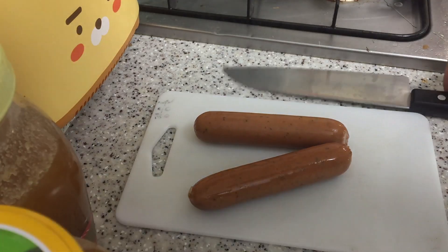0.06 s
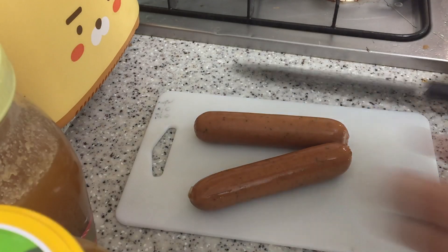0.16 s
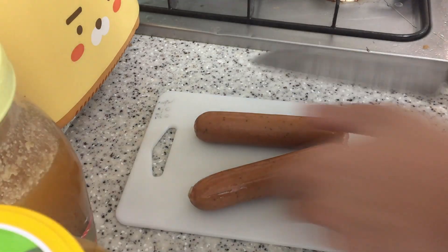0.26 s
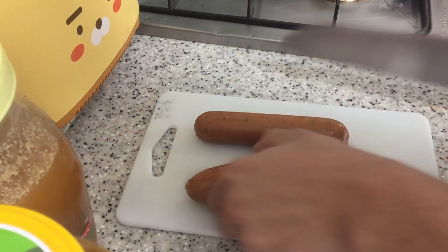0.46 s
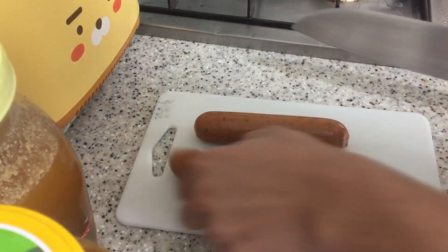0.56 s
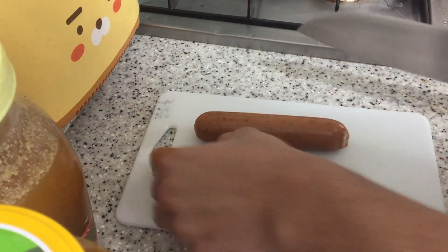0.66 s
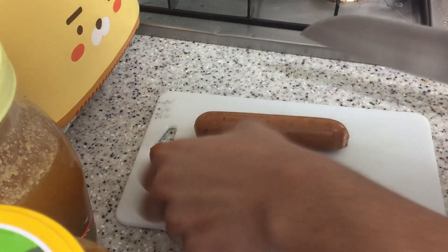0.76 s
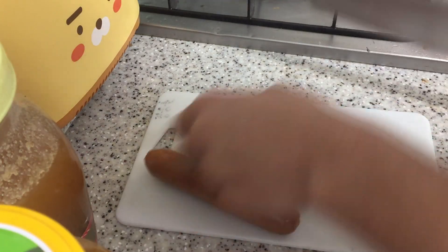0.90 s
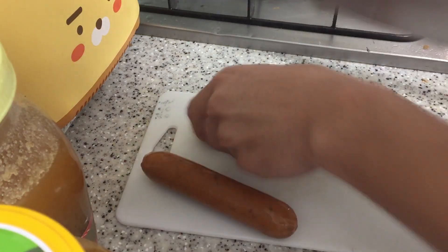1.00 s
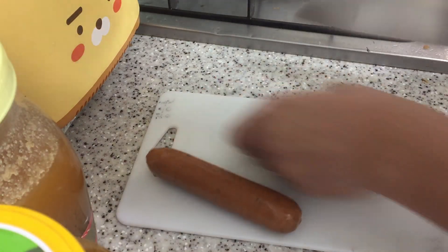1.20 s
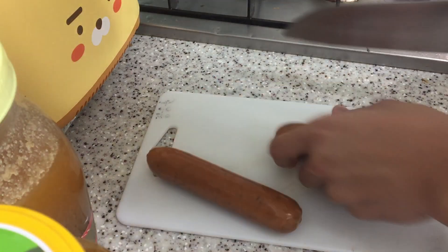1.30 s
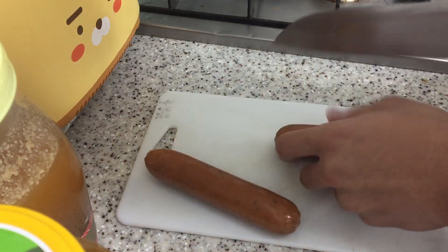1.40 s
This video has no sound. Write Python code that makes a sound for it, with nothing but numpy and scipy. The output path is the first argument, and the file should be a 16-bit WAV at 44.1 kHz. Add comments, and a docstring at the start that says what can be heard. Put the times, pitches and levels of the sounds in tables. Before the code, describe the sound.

A metal knife is lifted from a stone counter with a short, bright scrape, a knock and a brief ring. Then a hand softly rubs and taps a sausage on a plastic board. A refrigerator hums faintly in the small kitchen.

```python
"""A kitchen knife is picked up from a stone counter: the blade drags, scrapes brightly, knocks and rings.
Tiny slips of the edge on the stone hiss, squeal and drive the blade's resonances; the knocks
thump through the counter. Then a hand shifts a sausage on a plastic board, with soft, moist taps
and some rubbing. A refrigerator hums in the small kitchen."""
import sys
import numpy as np
from scipy import signal
from scipy.fft import rfft, irfft
from scipy.io import wavfile

SR = 44100
rng = np.random.default_rng(int(sys.argv[2]) if len(sys.argv) > 2 else 0)


def to_wav(sig):
    """Store sig (one row per channel, or 1-D mono) as 16-bit WAV at the path in sys.argv[1].

    Samples outside -1..1 are clipped; the rate is SR.
    """
    pcm = np.clip(np.atleast_2d(sig), -1, 1) * 32767
    pcm = np.round(pcm).astype(np.int16)
    wavfile.write(sys.argv[1], SR, pcm.T)  # frames by channels


N = 63945
TIME = np.arange(N) / SR


def blade_scrape():
    """Slips of the edge over stone hiss and drive the blade's resonances."""
    # force of the drag: t/s, level/dB
    drag = [(0.092, -73), (0.14, -76), (0.156, -64), (0.17, -59.5), (0.182, -58), (0.2, -62.5),
            (0.249, -65), (0.256, -53), (0.272, -54.5), (0.285, -65), (0.296, -59.5), (0.326, -59.5),
            (0.349, -44.5), (0.367, -39), (0.386, -38.5), (0.403, -45), (0.422, -39.5), (0.434, -52),
            (0.47, -83)]
    # resonances of the blade while it touches the counter: f/Hz, width/Hz, level/dB
    pressed_modes = [(4390, 59, -1.5), (4790, 44, -4), (5100, 50, -15), (5530, 80, -2.5), (6680, 73, -13),
                     (6310, 13, -3.5), (7340, 79, -13.5), (8520, 35, -6), (9200, 36, 0.5), (9500, 47, -2.5),
                     (10000, 60, -9), (11100, 33, -1.5), (11800, 65, -2), (11800, 35, -21),
                     (12240, 30, -12), (12700, 50, -21), (14000, 46, -17), (14900, 78, -25),
                     (16200, 42, 2.5)]
    # hiss of the contact: f/Hz, level/dB
    grit_colour = [(90, -21), (500, -5), (900, -30), (1300, -12.5), (2000, -5.5), (2700, -2), (3200, -13.5),
                   (3800, -12), (5400, -6.5), (7500, -7), (10000, -6), (13300, -14), (15500, -5)]

    def blade(x):
        return sum(from_db(db) * resonate(x, hz, width) for hz, width, db in pressed_modes)

    slips = friction()
    force = from_db(np.interp(TIME, *np.transpose(drag), left=-120, right=-120))
    force *= from_db(2 * drift(hz=150))  # the edge grips unevenly
    ringing = from_db(-4.5) * blade(slips * force) / np.std(blade(slips))
    grit = from_db(-2.5) * force * coloured(slips, grit_colour)
    # sparse, sharp grains of stone under the edge
    sizzle = from_db(-11) * force * rms_one(cut(friction(per_s=900), 11500, "high"))
    scrape = ringing + grit + sizzle
    # slightly thinner until the edge bites at 0.265 s
    bite = np.clip(1 + (TIME - 0.265) / 0.018, from_db(-1.5), 1)
    return bite * scrape + (1 - bite) * cut(scrape, 7300, "high")


def blade_squeals(sag_hz_per_s=810):
    """As the contact slides along the edge, one mode after another swells, sags in pitch and fades."""
    # short, rough tones: peak t/s, half length/s, f/Hz, level/dB
    squeals = [(0.157, .006, 5440, -57), (0.204, 0.02, 5430, -63), (0.172, 0.011, 3700, -58.5),
               (0.272, 0.018, 2340, -57.5), (0.299, 0.0066, 2414, -49.5), (0.321, 0.023, 2343, -56),
               (0.3, 0.026, 4225, -60.5), (0.3494, 0.018, 3870, -49.5), (0.35, 0.011, 6300, -48.5),
               (0.352, 0.011, 4360, -56), (0.364, 0.011, 2362, -40), (0.375, 0.012, 1798, -45),
               (0.372, 0.0063, 3650, -44), (0.37, 0.006, 8330, -41.5), (0.385, 0.015, 8515, -46),
               (0.382, 0.0039, 3530, -42.5), (0.382, 0.0085, 9700, -39), (0.41, 0.024, 9590, -49),
               (0.383, 0.0082, 3100, -51), (0.383, 0.0096, 4340, -41.5), (0.394, 0.016, 1270, -48),
               (0.382, 0.019, 5615, -53), (0.386, 0.0094, 5290, -43.5), (0.392, 0.021, 2248, -51),
               (0.393, 0.0084, 6610, -43.5), (0.395, 0.027, 12270, -47), (0.412, 0.016, 4177, -39),
               (0.4, .008, 15300, -56), (0.42, .01, 14000, -48), (0.417, 0.016, 10960, -46.5)]
    out = 0
    for s, half_s, hz, db in squeals:
        age = TIME - s
        turns = hz * age - sag_hz_per_s * age ** 2 / 2
        swell = from_db(db) * np.exp(-(age / half_s) ** 2)
        out += swell * wavering(turns, depth=0.23, rate_hz=90)
    return out


def edge_ticks():
    """The edge catches on the stone in short, bright ticks, each with its own low edge."""
    # catches: t/s, level/dB, t60/s, low edge/Hz
    catches = [(0.0968, -61.5, 0.018, 1500), (0.14, -57.5, 0.055, 800), (0.256, -62, 0.024, 7000),
               (0.274, -45.5, 0.035, 4260), (0.4106, -44, 0.028, 3500)]
    # spectrum of a catch: f/Hz, level/dB
    tick_colour = [(700, -18), (1500, 2), (3300, 4), (4500, 7), (9000, -3), (15800, -25)]
    slips = coloured(friction(), tick_colour)
    return sum(from_db(db) * decay(s, t60) * cut(slips, low_hz, "high")
               for s, db, t60, low_hz in catches)


def blade_clink():
    """A blow sets the free blade's modes ringing."""
    # blow on the blade: t/s, level/dB
    blows = [(0.4236, -37.5)]
    # modes of the free blade: f/Hz, level/dB, t60/s
    free_modes = [(1195, 6, .07), (1385, -7, .05), (1525, -3, .05), (1700, -17, .17), (2017, 1, .15),
                  (2254, -5, .11), (2405, -5, .06), (2680, -7, .18), (2751, -4, .16), (3440, -10, .04),
                  (4139, -2.5, .33), (4204, -4, .25), (4637, -4, .11), (4770, -6, .12), (5406, -5, .08),
                  (7429, -16, .18), (9190, -15, .11), (9570, -13, .1), (10960, -19, .1), (12580, -20, .29),
                  (13790, -15, .24)]
    return sum(from_db(db) * strike(s, free_modes) for s, db in blows)


def handle_knocks():
    """Each knock is a dull, quickly damped clack on top of the counter's low thump."""
    # knocks: t/s, level/dB, body f/Hz, body width/Hz, top edge/Hz, thump/dB, scatter/dB
    knocks = [(0.1425, -43, 620, 245, 1160, 2.5, -0.5), (0.151, -49.5, 445, 300, 910, 7.5, 6.5),
              (0.1808, -31, 1430, 200, 2200, -4.5, -15), (0.1799, -37.5, 3200, 704, 3500, -3, -8),
              (0.4181, -21, 575, 1560, 2460, -13, -10.5), (0.4233, -22, 2080, 268, 3030, -15, -4),
              (0.4236, -24.5, 1300, 189, 2100, -11, -23), (0.4289, -31.5, 2320, 450, 2980, -20, -3)]
    out = 0
    for s, db, hz, width_hz, edge_hz, thump_db, scatter_db in knocks:
        body = resonate(signal.unit_impulse(N, int(s * SR)), hz, width_hz)
        clack = cut(body, edge_hz, "low", order=4)
        clack /= np.abs(clack).max()
        # sound scatters from the things on the counter
        scatter = from_db(scatter_db) * reflect(clack, t60=0.096, delay_s=0.0032)
        thump = from_db(thump_db) * counter_ring(s)
        out += from_db(db) * (clack + scatter + thump)
    return cut(out, 163, "high", order=4)


def handle_rumble(peak_s=0.309, half_s=0.04):
    """Friction of the dragged handle shakes the counter's modes."""
    swell = from_db(-55) * np.exp(-((TIME - peak_s) / half_s) ** 2)
    shaking = signal.fftconvolve(friction(), counter_ring(0))[:N]
    return swell * rms_one(shaking)


def counter_ring(s):
    """The counter rings low after a blow at time s; peak 1."""
    # low modes of the counter top and board: f/Hz, level/dB, t60/s
    counter_modes = [(173, -6, 0.04), (283, 1.5, 0.095), (341, 2.5, 0.067), (478, 5.5, 0.069),
                     (571.5, -2, 0.082), (661, 2.5, 0.091), (874, -12.5, 0.12)]
    ringing = strike(s, counter_modes)
    return ringing / np.abs(ringing).max()


def board_taps():
    """Soft contacts ring the hollow plastic board, and the moist skin crackles at each one."""
    # taps on the board: t/s, level/dB, top edge/Hz
    taps = [(1.1614, -56.5, 9100), (1.1635, -50, 2540), (1.187, -60, 5000), (1.197, -59.5, 2000)]
    # modes of the plastic board: f/Hz, level/dB, t60/s
    board_modes = [(1262, -2.5, 0.05), (1500, 0, 0.039), (2020, -2, 0.072), (2283, -1.5, 0.06),
                   (2550, -2, .04), (3190, -4.5, 0.037), (3500, -5, 0.081), (5800, -8, 0.037),
                   (6640, -5.5, 0.037)]
    # crackle of moist skin: f/Hz, level/dB
    squish_colour = [(250, -2), (800, -4.5), (2200, -2), (4200, -12), (9000, -18), (14000, -45)]
    out = 0
    for s, db, edge_hz in taps:
        squish = from_db(2) * decay(s, t60=0.064) * coloured(friction(), squish_colour)
        out += from_db(db) * cut(strike(s, board_modes) + squish, edge_hz, "low")
    return out


def soft_thuds():
    """Hand and sausage land softly, each thud one low, dying tone."""
    # landings: t/s, level/dB, f/Hz, t60/s
    thuds = [(0.269, -60, 59.5, 0.24), (0.73, -58, 64.8, 0.25), (1.163, -40, 306, 0.045),
             (1.167, -48, 195, 0.097), (1.185, -47.5, 116, 0.11), (1.2, -59, 50.4, .14)]
    return sum(from_db(db) * ring(s, hz, t60) for s, db, hz, t60 in thuds)


def skin_rubs():
    """Skin rubs over the board in swells that each bring out one resonance."""
    # strokes: peak t/s, level/dB, attack/s, release/s, top edge/Hz, resonance f/Hz
    rubs = [(0.673, -54.5, 0.024, 0.031, 2520, 600), (0.73, -69.5, 0.063, 0.048, 8000, 3500),
            (1.01, -68.5, 0.031, 0.027, 12000, 4470), (1.305, -58.5, 0.053, 0.08, 9300, 5620),
            (1.35, -58, 0.058, 0.064, 12000, 3500)]
    # friction of skin on plastic: f/Hz, level/dB
    rub_colour = [(500, -23), (1250, -13.5), (1580, -2), (1900, -11.5), (2700, -9.5), (3150, -4.5),
                  (3500, -3), (4000, -5.5), (5700, -9.5), (7000, -10), (9000, -12), (15000, -22)]
    out = 0
    for s, db, attack, release, edge_hz, ring_hz in rubs:
        skin = coloured(friction(), rub_colour)
        skin += from_db(4.5) * resonate(skin, ring_hz, width_hz=220)
        from_peak = np.maximum((s - TIME) / attack, (TIME - s) / release)
        swell = from_db(db - 14.2 * from_peak ** 1.4)
        out += swell * cut(rms_one(skin), edge_hz, "low", order=1)
    return out


def refrigerator(motor_hz=58.7):
    """The motor's harmonics waver under a faint, narrow whine."""
    # hum: multiple of the motor's speed, level/dB
    harmonics = [(1, -77.5), (2, -72.5), (3, -60.5), (5, -73), (6, -65), (7, -67), (9, -73), (10, -67),
                 (11, -72)]
    hum = sum(from_db(db) * np.sqrt(2) * wavering(k * motor_hz * TIME, depth=0.21, rate_hz=5)
              for k, db in harmonics)
    whine = resonate(rng.standard_normal(N), hz=3476, width_hz=56)
    return hum + from_db(-80) * rms_one(whine)


def room_tone():
    """A steady, dark bed of noise."""
    # air of the kitchen: f/Hz, level/dB
    air_colour = [(25, -24), (55, -11.5), (85, -7), (130, -6.5), (175, 8.5), (240, -4.5), (340, -0.5),
                  (480, -8.5), (650, -15.5), (820, -20), (1500, -20.5), (2800, -22), (3500, -20),
                  (4500, -26.5), (9000, -32), (15000, -40)]
    noise = cut(rng.standard_normal(N), 39, "high", order=4)
    return from_db(-59) * coloured(noise, air_colour)


def friction(per_s=5000, spread_db=3.0):
    """Tiny slips of uneven size at random moments."""
    sizes = from_db(spread_db * np.minimum(rng.exponential(1, N), 4))
    signs = rng.choice([-1, 1], N)
    return sizes * signs * (rng.random(N) < per_s / SR)


def decay(s, t60):
    """An envelope that opens at time s and falls 60 dB in t60 seconds."""
    return (TIME >= s) * from_db(-60 * np.abs(TIME - s) / t60)


def ring(s, hz, t60):
    """A sine struck at time s, dying away."""
    return np.sin(2 * np.pi * hz * (TIME - s)) * decay(s, t60)


def strike(s, modes):
    """A body's modes struck together at time s, in alternating polarity."""
    return sum((-1) ** k * from_db(db) * ring(s, hz, t60) for k, (hz, db, t60) in enumerate(modes))


def resonate(x, hz, width_hz):
    """A resonance with unit gain at its peak."""
    r = np.exp(-np.pi * width_hz / SR)
    feedforward = np.array([1, 0, -1]) * (1 - r * r) / 2
    feedback = [1, -2 * r * np.cos(2 * np.pi * hz / SR), r * r]
    return signal.lfilter(feedforward, feedback, x + 1e-18)


def reflect(x, t60, delay_s):
    """Dense reflections that start after a delay and die away."""
    tail = rng.standard_normal(N) * decay(0, t60) * (TIME > delay_s)
    return signal.fftconvolve(x, tail / np.sqrt(np.sum(tail ** 2)))[:N]


def wavering(turns, depth, rate_hz):
    """A tone whose level and phase wander."""
    wander = 1 + depth * (drift(rate_hz) + 1j * drift(rate_hz))
    return np.real(wander * np.exp(2j * np.pi * (turns + rng.random())))


def drift(hz):
    """Random wander below hz, of unit spread."""
    return rms_one(cut(rng.standard_normal(2 * N), hz, "low")[N:])


def coloured(x, points):
    """Give noise a spectrum; unit power."""
    hz, db = np.transpose(points)
    bins = np.maximum(np.fft.rfftfreq(N, 1 / SR), 1)
    gain = from_db(np.interp(np.log(bins), np.log(hz), db))
    return rms_one(irfft(rfft(x) * gain, N))


def cut(x, hz, kind, order=2):
    """Low-pass or high-pass."""
    return signal.sosfilt(signal.butter(order, hz, kind, fs=SR, output="sos"), x)


def from_db(db):
    """Decibels to gain."""
    return 10 ** (np.asarray(db) / 20)


def rms_one(x):
    """Scale to unit power."""
    return x / np.sqrt(np.mean(x ** 2) + 1e-20)


def scene():
    """Knife, then sausage, in the kitchen's short reverb over hum and room tone; mono."""
    knife = blade_scrape() + blade_squeals() + edge_ticks()
    knife += handle_rumble() + blade_clink() + handle_knocks()
    direct = knife + board_taps() + soft_thuds() + skin_rubs()
    reverb = from_db(-12.5) * cut(reflect(direct, t60=0.18, delay_s=0.007), 14000, "low")
    return (direct + reverb + refrigerator() + room_tone())[None]


def record(dry, cutoff_hz=15720):
    """A steep low-pass takes off the very top."""
    return signal.sosfilt(signal.ellip(12, .1, 80, cutoff_hz, fs=SR, output="sos"), dry)


dry = scene()
out = record(dry)
to_wav(out)
```